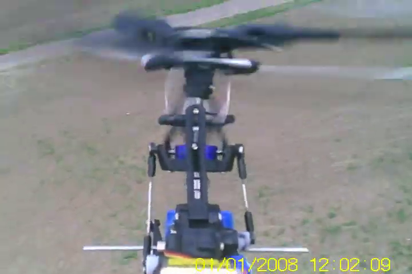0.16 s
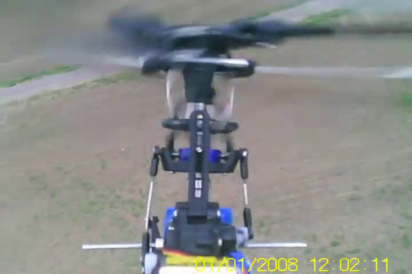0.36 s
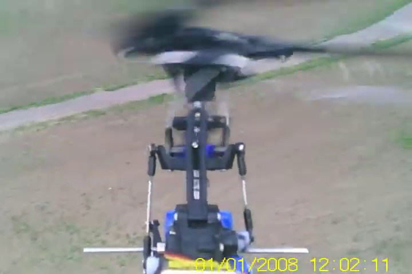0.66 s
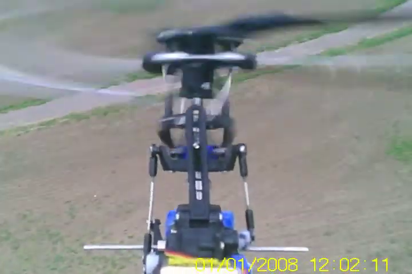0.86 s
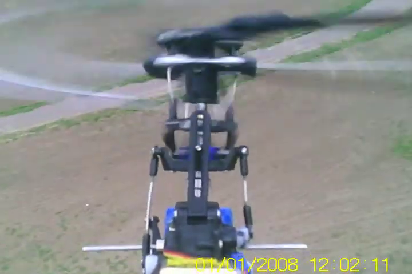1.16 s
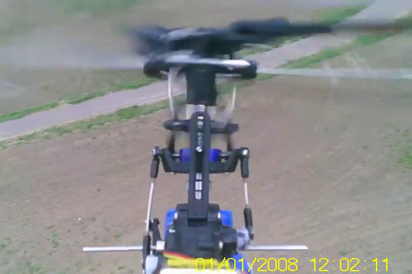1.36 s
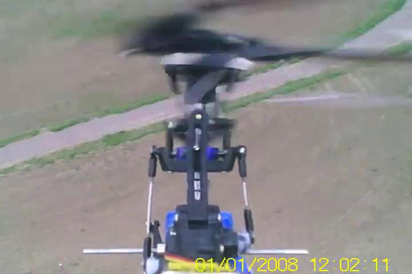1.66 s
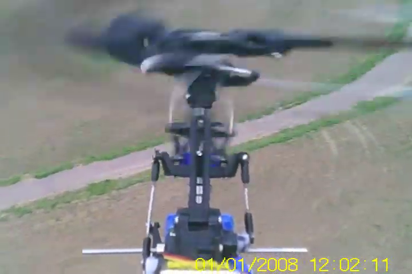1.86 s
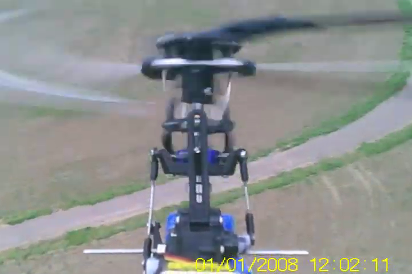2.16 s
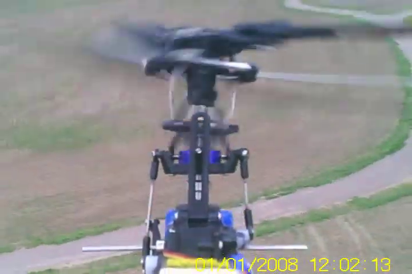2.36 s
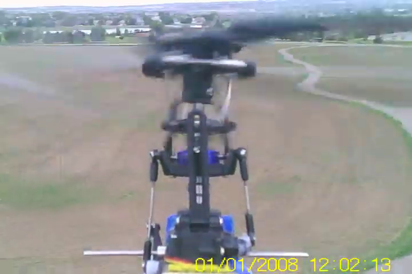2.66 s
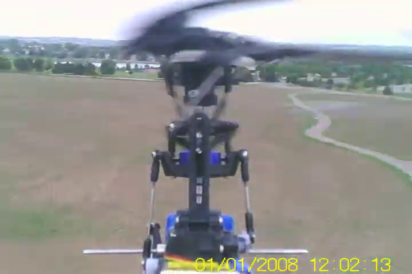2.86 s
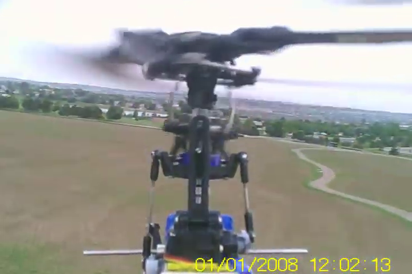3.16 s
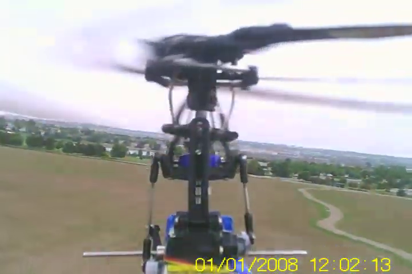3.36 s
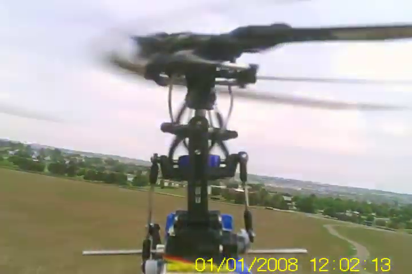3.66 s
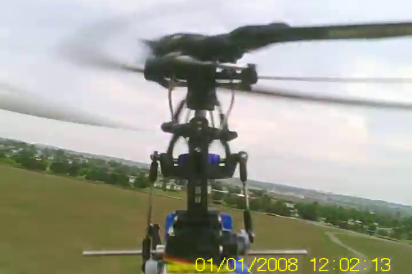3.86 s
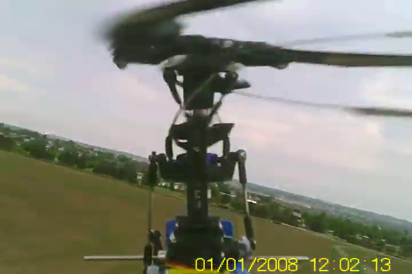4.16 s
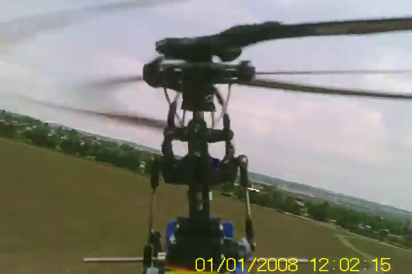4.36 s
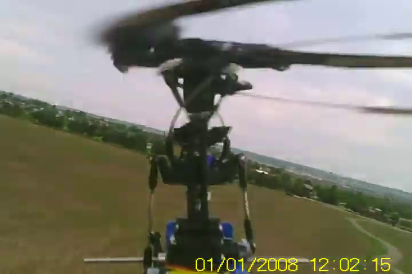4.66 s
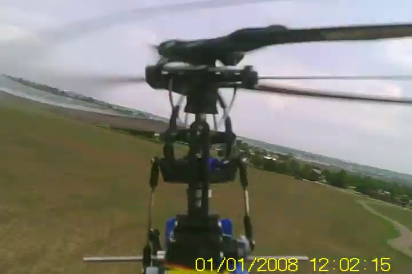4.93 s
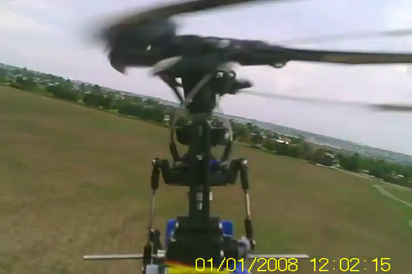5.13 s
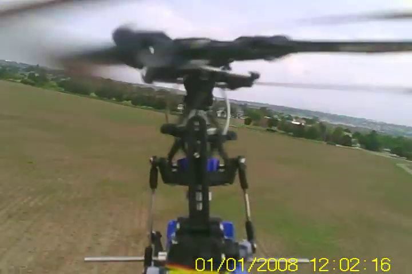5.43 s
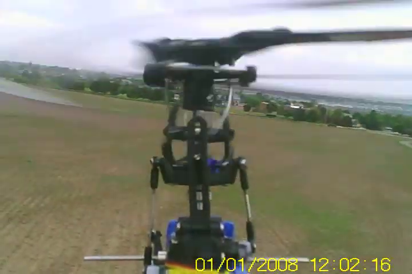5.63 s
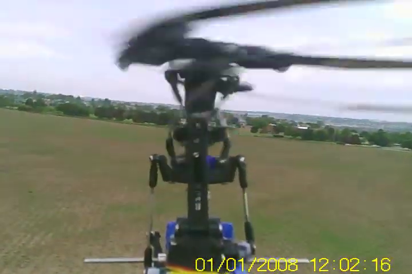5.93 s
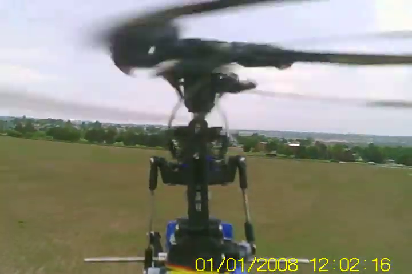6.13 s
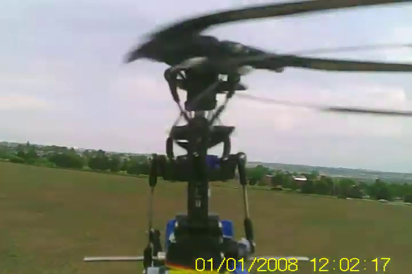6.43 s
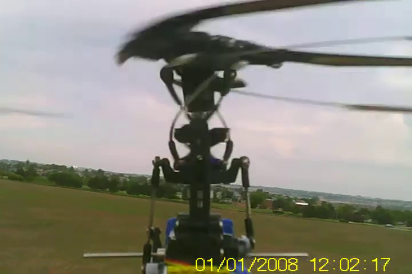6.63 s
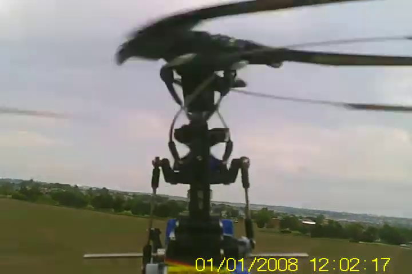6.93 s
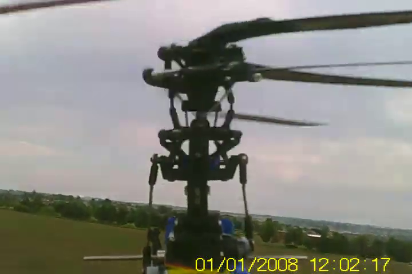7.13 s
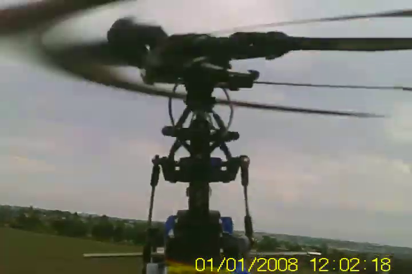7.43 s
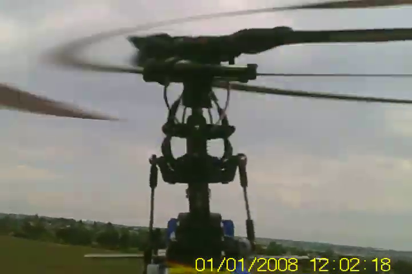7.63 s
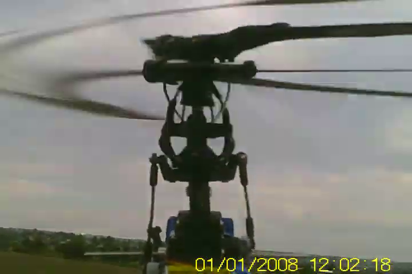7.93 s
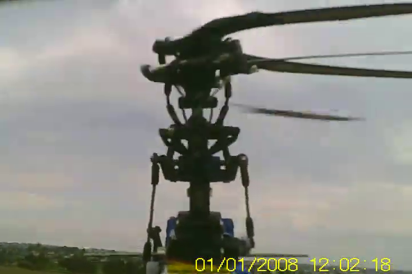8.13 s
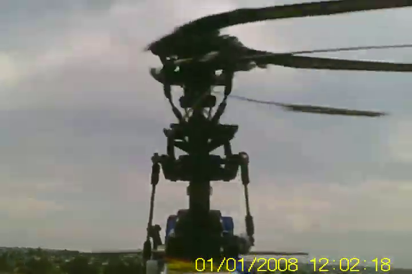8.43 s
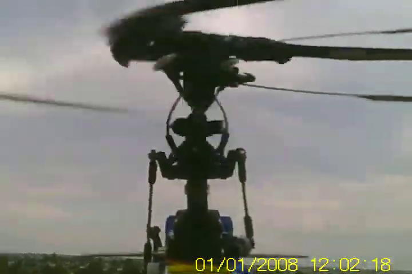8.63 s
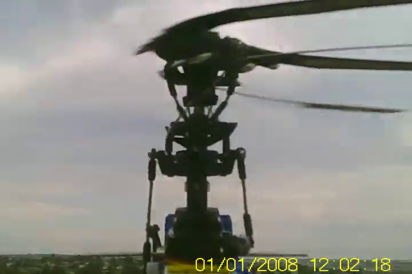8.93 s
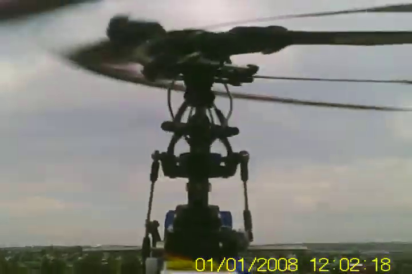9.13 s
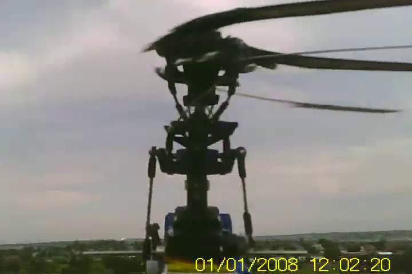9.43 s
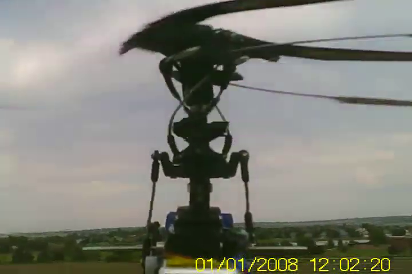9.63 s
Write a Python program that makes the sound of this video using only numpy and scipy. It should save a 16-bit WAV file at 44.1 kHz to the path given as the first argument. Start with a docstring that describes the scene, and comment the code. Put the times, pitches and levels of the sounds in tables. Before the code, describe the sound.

Heard from on board in the open air, an electric model helicopter drones with rapid blade pulses, a high motor whine and rasping gears. Early on the rotor slows under load, every tone gliding down together, with crackling blade slap and wind buffeting the microphone. The speed recovers around the middle, the air rushes harder for a moment, and the buzz and whine carry on evenly to the end.

```python
"""The two-bladed main rotor of a small electric model helicopter, heard from its frame in flight.
Each blade sheds a pressure pulse, a thump, and trails turbulent air that rushes and rumbles.
The tail rotor buzzes, while motor and gears whine and rattle through the frame's resonances.
All are geared to one shaft, so their pitches fall together as the head speed sags under load
in a turn, and rise as it recovers."""
import sys
import numpy as np
from scipy.fft import rfft, irfft, next_fast_len
from scipy.io import wavfile
from scipy.ndimage import map_coordinates

SR = 44100
rng = np.random.default_rng(int(sys.argv[2]) if len(sys.argv) > 2 else 0)


def wav_out(sig):
    """Save sig, one row per channel (or a flat mono array), as 16-bit PCM at SR to the path in sys.argv[1]."""
    wavfile.write(sys.argv[1], SR, np.round(np.clip(np.atleast_2d(sig).T, -1, 1) * 32767).astype(np.int16))


N = 431738

# steady flight, the reference for shaft speed, lift and turbulence
CRUISE_HZ, CRUISE_LIFT_DB, CRUISE_TURBULENCE_DB = 36.8, -17, -40


def amp(db):
    """Decibels to amplitude ratio."""
    return 10 ** (np.asarray(db) / 20)


def unit(x):
    """Normalisation to rms 1."""
    return x / np.sqrt(np.mean(x ** 2) + 1e-20)


def curve(rows):
    """Linear interpolation of (time [s], value) rows to every sample."""
    times, values = np.transpose(rows)
    return np.interp(np.arange(N) / SR, times, values)


def wobble(rate):
    """Smooth random modulation: a spline with `rate` knots a second."""
    knots = rng.standard_normal(N // 8)
    return map_coordinates(knots, [np.arange(N) * rate / SR + 2], order=2, mode="wrap")


def filtered(x, response):
    """Linear filtering: the spectrum of x times a frequency response."""
    size = next_fast_len(N + 8192)
    return irfft(rfft(x, size) * response(np.fft.rfftfreq(size, 1 / SR)), size)[:N]


def coloured(x, points):
    """Spectral shaping by (frequency [Hz], level [dB]) points, normalised to rms 1."""
    freqs, db = np.transpose(points)
    return unit(filtered(x, lambda hz: amp(np.interp(np.log(hz + 1), np.log(freqs), db))))


def swell(centre_s, half_s):
    """A Gaussian envelope of height 1."""
    return np.exp(-((np.arange(N) / SR - centre_s) / half_s) ** 2)


def lobe(cycles, centre, width):
    """A periodic envelope: one smooth bump a cycle."""
    return np.exp((np.cos(2 * np.pi * (cycles - centre)) - 1) / (2 * np.pi * width) ** 2)


def burst(cycles, start, decay, attack=0.014):
    """A periodic envelope: quick rise and exponential decay, once a cycle."""
    age = (cycles - start) % 1
    return (1 - np.exp(-age / attack)) * np.exp(-age / decay)


def flight():
    """Rotor loading: shaft speed [Hz], and lift and turbulence [dB re cruise], both raised by gusts."""
    # main shaft rotation: (time [s], speed [Hz])
    shaft_speed = [(0.0, 38.07), (0.7, 36.523), (1.52, 33.631), (2.0, 32.445), (2.42, 31.761),
                   (3.4, 29.891), (3.7, 30.058), (4.65, 32.763), (5.07, 34.265), (5.18, 34.768),
                   (5.68, 35.842), (6.16, 36.4), (6.85, 36.729), (8.4, 36.844), (8.73, 37.155),
                   (9.79, 38.056)]
    # blade loading: (time [s], level [dB])
    blade_lift = [(0.0, -23.6), (0.42, -25.4), (0.53, -22.5), (1.62, -22.0), (1.77, -18.2), (2.85, -17.4),
                  (4.52, -17.8), (4.68, -16.1), (5.37, -16.3), (6.17, -16.0), (6.58, -14.2), (7.02, -17.2),
                  (7.26, -15.3), (8.0, -15.9), (8.12, -18.2), (8.45, -17.0), (9.62, -17.4), (9.79, -19.6)]
    # roughness of the air through the rotor: (time [s], level [dB])
    rough_air = [(0, -50), (.6, -45), (1.3, -40.5), (1.95, -40.5), (2.5, -38), (3.9, -39), (4.32, -41.5),
                 (4.95, -42), (5.85, -36.5), (6.6, -38.5), (6.9, -40.5), (7.6, -40), (9.79, -43.5)]
    # gusts on the blades: (time [s], half length [s], extra lift [dB])
    gusts = [(1.027, 0.082, 2.8), (1.287, 0.087, 3), (1.595, 0.068, 4), (2.756, .04, 1), (3.88, 0.042, 1),
             (5.04, 0.1, 1.8)]
    gust_db = sum(db * swell(time, half) for time, half, db in gusts)
    turbulence = curve(rough_air) - CRUISE_TURBULENCE_DB + 0.35 * gust_db
    unsteady_db = 0.26 * amp(turbulence) * wobble(12)
    lift = curve(blade_lift) - CRUISE_LIFT_DB + gust_db + unsteady_db
    return curve(shaft_speed), lift, turbulence


def main_rotor(turns, speed, lift, turbulence, skew_rad=0.3):
    """Loading noise: each blade sheds a pulse, sharpened by speed, rough air and the nearing wake."""
    # pulse overtones: (multiple of the blade rate, relative level [dB], share of the edge gain)
    harmonics = [(2, 0.5, 0), (3, -5.5, 0.059), (4, -12.5, 0.3), (5, -18, 0.94), (6, -23, 0.85),
                 (8, -30.5, 0.97)]
    # the rotor sinks through its own wake once, and the thump turns hollow
    fundamental_db = CRUISE_LIFT_DB + lift - 7 * swell(5.81, half_s=0.12)
    overtone_db = -23 + 0.79 * lift + 0.19 * turbulence
    near_wake_db = 7 * swell(5.6, half_s=0.74)
    edge_db = 0.18 * turbulence + 0.5 * (speed - CRUISE_HZ) + near_wake_db
    angle = 2 * np.pi * (2 * turns - 0.1106 + 0.0015 * wobble(60))
    overtones = sum(amp(db + share * edge_db) * np.cos(k * angle - skew_rad * (k - 1))
                    for k, db, share in harmonics)
    pulses = np.sqrt(2) * (amp(fundamental_db) * np.cos(angle) + amp(overtone_db) * overtones)
    # the two blades never lift quite alike: under load the frame shakes once a turn
    shake = amp(-35 + 2.8 * lift + 3.6 * wobble(6)) * np.sin(angle / 2)
    return pulses * amp(-0.13 * wobble(31)) + shake


def tail_rotor(turns, lift, slack_turns=0.001):
    """Fixed gear ratios: tail blade and shaft tones glide with the main rotor and grow with its lift."""
    # tail blade and shaft tones: (multiple of the shaft rate)
    orders = [5, 7, 14, 15, 18]
    # the same tones at cruise: (level [dB])
    levels = [-35, -49, -35.5, -43, -54]
    angle = 2 * np.pi * (turns + slack_turns * wobble(26))
    tones = sum(amp(db + wobble(5.3)) * np.sin(k * angle + rng.uniform(0, 2 * np.pi))
                for k, db in zip(orders, levels))
    return amp(0.25 * lift) * tones


def whine(turns, speed, lift, waver_db=0.5, jitter_rad=0.06):
    """Forced vibration: motor and gear tones flare as they glide through the frame's resonances."""
    # motor and gear tones: (multiple of the shaft rate)
    orders = [10, 20, 21, 28, 30, 42, 55, 56, 60, 65, 70, 90, 93.5, 98.4, 112, 126, 154]
    # the same tones at cruise, before the frame's gain: (level [dB])
    levels = [-44.5, -51.5, -68.5, -61, -54.5, -60.5, -61.5, -63.5, -53, -69, -62, -59, -68, -66, -71.5,
              -60, -62.5]
    # their sensitivity to load: (gain [dB per dB of lift])
    load_slopes = [0.23, 0.18, 0.5, 0.32, 0.24, 0.2, 0.16, .5, 0.49, .3, .3, .3, .3, -0.087, 0.38, 0.49, .8]
    # frame resonances: (frequency [Hz], bandwidth [Hz], level [dB])
    modes = [(373, 65, 0), (673, 70, -3), (763, 54, 2.5), (1571, 91, 15.5), (1795, 140, 4.5),
             (2260, 100, -0.5), (3040, 140, 6), (3358, 184, 12.5), (3560, 130, -1), (3850, 310, -1),
             (4680, 250, -15)]
    hz = np.arange(SR // 4)
    response = 1 + sum(amp(db) / (1 + (2 * (hz - centre) / width) ** 2) for centre, width, db in modes)
    tones = np.zeros(N)
    for k, db, slope in zip(orders, levels, load_slopes):
        tone = -np.sin(2 * np.pi * k * turns + jitter_rad * wobble(70))
        frame_gain = np.interp(k * speed, hz, response)
        tones += frame_gain * amp(db + slope * lift + waver_db * wobble(14)) * tone
    throb = 1 + 0.15 * np.cos(2 * np.pi * turns)
    return tones * throb


def main_gear(turns, speed, lift, teeth=140, resonance_hz=5190, bandwidth_hz=330,
              pull_from_s=4.55, pull_to_s=4.92):
    """Gear mesh: the tooth-rate tone sings near a resonance, amplitude-modulated by eccentricity."""
    t = np.arange(N) / SR
    angle = 2 * np.pi * teeth * turns + 0.18 * wobble(120)
    tightness = np.cos(2 * np.pi * (turns - 0.92))
    resonance = 1 / (1 + (2 * (teeth * speed - resonance_hz) / bandwidth_hz) ** 2)
    contact = unit(0.28 + np.clip(0.5 + tightness, 0, 1))
    pinch = amp(-48.5 + 0.79 * lift) * resonance * contact
    # the gear sings all the way round while the motor pulls hard to win back the head speed
    eased_db = 6 * np.maximum(pull_from_s - t, 0) + 55 * np.maximum(t - pull_to_s, 0)
    pull = amp(-49.5 - eased_db) * (1 + 0.29 * tightness)
    fundamental = np.hypot(pinch, pull) * np.sin(angle)
    # uneven teeth smear the second harmonic into a narrow band
    octave = (1 + 0.6 * wobble(200)) * np.sin(2 * angle + 0.5 * wobble(150))
    overtone = (amp(-13) * pinch + amp(-5) * pull) * octave
    return amp(1.5 * wobble(60)) * (fundamental + overtone)


def rattle(turns, lift, surges_per_turn=5):
    """Friction noise: teeth and linkages chatter with the shaft; the frame rings, harder under lift."""
    # course of the tooth rasp: (time [s], level [dB])
    rasp_levels = [(0.05, -47), (0.29, -48.5), (1.04, -44.5), (3.27, -51.5), (4.38, -47.5), (6.61, -43),
                   (6.77, -46), (8.87, -46), (9.7, -44)]
    # where in a turn the teeth rub hardest: (start [turns], decay [turns], level [dB])
    rubs = [(.01, .04, -11), (.16, 0.14, 3), (0.641, 0.041, 11), (.8, .16, 1)]
    # spectrum of the rubbing teeth: (frequency [Hz], level [dB])
    rasp_spectrum = [(1500, -35.5), (3300, -11.5), (4300, -20.5), (5200, -3.5), (6200, -10.5), (6800, -2.5),
                     (7300, -1), (7750, 3), (8500, -8.5), (9600, -2.5), (10600, -8), (11300, -12),
                     (12000, -35)]
    # spectrum of the ringing frame: (frequency [Hz], level [dB])
    frame_spectrum = [(500, -14), (1100, -3), (1400, -6), (1800, -0.5), (2200, -11.5), (2650, -8),
                      (3050, 0), (3400, -0.5), (3750, -5), (4200, -15), (5200, -13), (6200, -21.5),
                      (12000, -32.5)]
    rasp_db = curve(rasp_levels) + 1.5
    frame_db = -42 + 0.37 * lift + 0.083 * (rasp_db - rasp_db.mean())
    rub = unit(0.41 + sum(amp(db) * burst(turns, start, decay) for start, decay, db in rubs))
    surge = 1 + 0.092 * np.cos(2 * np.pi * surges_per_turn * (turns - 0.03))  # from a faster shaft
    grit = rub * surge * amp(2 * wobble(900) + 1.45 * wobble(90))
    rasp = coloured(grit * rng.standard_normal(N), rasp_spectrum)
    shaking = (1 + 0.22 * rub) * surge * amp(1.4 * wobble(300))
    frame = coloured(shaking * rng.standard_normal(N), frame_spectrum)
    return amp(rasp_db) * rasp + amp(frame_db) * frame


def buffet(speed, lift, sag_db_per_hz=0.7, lumps_db=3.5):
    """Wind noise: lumps of air rumble on the microphone, most in the turn that drags the rotor down."""
    # spectrum of the wind pressure: (frequency [Hz], level [dB])
    spectrum = [(8, -29), (20, 5.5), (45, -5.5), (100, -5.5), (200, -27), (400, -33), (900, -72)]
    level_db = -34 + 0.43 * lift + sag_db_per_hz * (CRUISE_HZ - speed) + lumps_db * wobble(7)
    return amp(level_db) * coloured(rng.standard_normal(N), spectrum)


def wash(turns, lift, turbulence):
    """Broadband flow noise: turbulent air rushes down from the rotor and swishes with each blade."""
    # spectrum of the downwash: (frequency [Hz], level [dB])
    spectrum = [(100, -22), (260, -1.5), (450, 1), (650, 1.5), (1000, -1), (1400, -7.5), (1850, -13),
                (2200, -16), (3500, -21.5), (6000, -39), (12000, -56)]
    swish = 1 + 0.3 * lobe(2 * turns, centre=0.85, width=0.088)
    eddies = swish * amp(0.9 * wobble(70)) * rng.standard_normal(N)
    return amp(-40.7 + 1.23 * turbulence + 0.3 * lift) * coloured(eddies, spectrum)


def churn(lift, turbulence, flutter_db=2.5):
    """Large-scale turbulence: big eddies flutter beneath the rotor and grow quickly in rough air."""
    # spectrum of the big eddies: (frequency [Hz], level [dB])
    spectrum = [(40, -3), (90, -0.5), (140, 1), (250, -4.5), (400, -9.5), (700, -26.5), (2000, -72)]
    level_db = -34.5 + 1.63 * turbulence + 0.18 * lift + flutter_db * wobble(11)
    return amp(level_db) * coloured(rng.standard_normal(N), spectrum)


def slap(turns, speed, turbulence):
    """Blade-wake interaction: labouring blades strike their own wake with a snap and a crack of air."""
    # spectrum of the short noise burst: (frequency [Hz], level [dB])
    crack_spectrum = [(100, -8), (250, 12.5), (500, 2), (900, 6.5), (1400, 1), (1900, -11), (2400, -5.5),
                      (3300, -17), (5000, -31), (12000, -53)]
    # spectrum of the sharp impulse: (frequency [Hz], level [dB])
    snap_spectrum = [(300, -27), (600, -1), (1000, 0.5), (1700, -2.5), (2500, -13), (6000, -36)]
    sag_hz = CRUISE_HZ - speed
    bursts = burst(2 * turns, start=0.12, decay=0.12, attack=0.032) * amp(1.4 * wobble(60))
    crack = coloured(bursts * rng.standard_normal(N), crack_spectrum)
    crack_db = -47 + 1.85 * turbulence + 0.69 * sag_hz
    blade_count = np.floor(2 * turns - 0.14 + 0.024 * wobble(150))  # steps at each pressure peak
    strikes = np.diff(blade_count, prepend=blade_count[0]) * amp(1.5 * wobble(60))
    snap_db = -53 + 0.96 * turbulence + 1.5 * sag_hz
    return amp(crack_db) * crack + amp(snap_db) * coloured(strikes, snap_spectrum)


def scene():
    """Superposition of sources driven by one shaft angle and one state of flight."""
    speed, lift, turbulence = flight()
    turns = np.cumsum(speed) / SR
    rotors = main_rotor(turns, speed, lift, turbulence) + tail_rotor(turns, lift)
    drive = whine(turns, speed, lift) + main_gear(turns, speed, lift) + rattle(turns, lift)
    air = buffet(speed, lift) + wash(turns, lift, turbulence) + churn(lift, turbulence)
    return (rotors + drive + air + slap(turns, speed, turbulence))[None]


def record(dry):
    """Band limiting: an ideal low-pass filter passes nothing above its cutoff."""
    cutoff_hz = 12300
    return filtered(dry[0], lambda hz: hz < cutoff_hz)[None]


dry = scene()
out = record(dry)
wav_out(out)
```